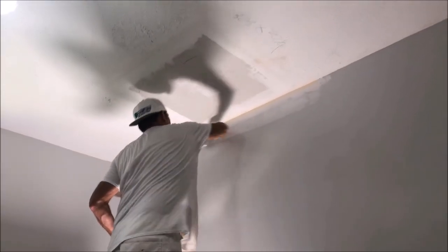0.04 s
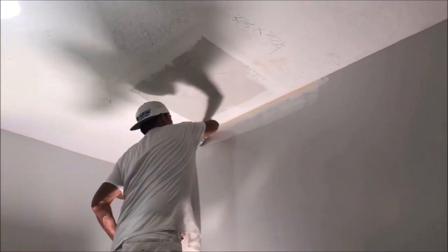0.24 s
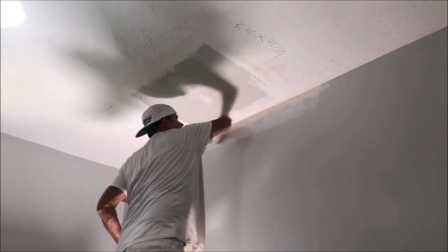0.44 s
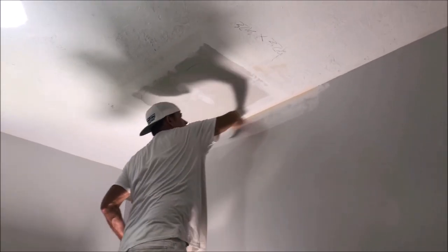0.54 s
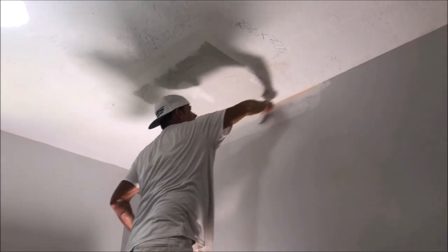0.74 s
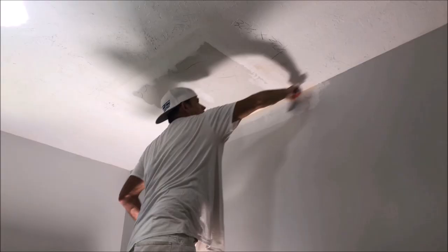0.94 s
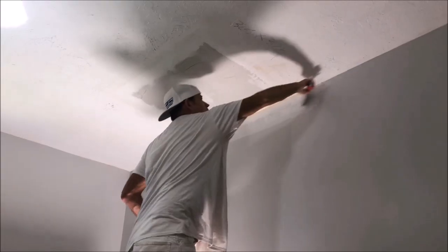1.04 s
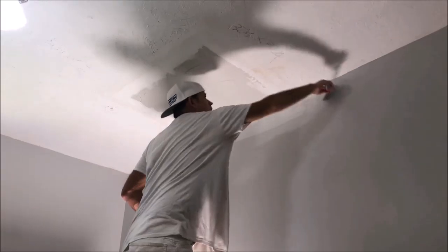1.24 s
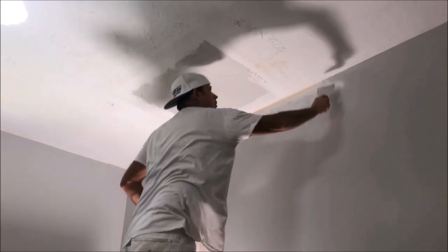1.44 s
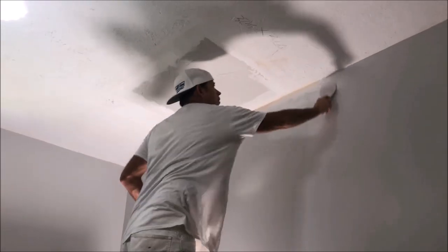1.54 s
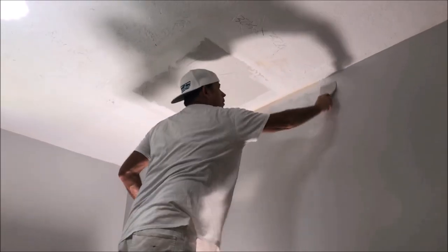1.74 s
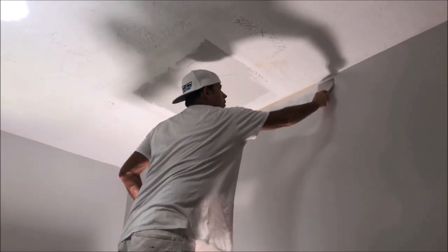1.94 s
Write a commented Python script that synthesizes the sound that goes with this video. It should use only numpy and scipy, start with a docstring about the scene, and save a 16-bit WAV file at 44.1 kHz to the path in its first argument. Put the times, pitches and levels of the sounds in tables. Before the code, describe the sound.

A steel taping knife scrapes dried compound on a ceiling joint. It touches down with a juddering clack around 0.25 s, then rasps from 0.35 to 1.4 s, gritty and ringing, with thin wavering squeaks, ending in a hard rattling catch near 1.35 s. After a short gap, a sharp, loud knock lands at 1.6 s, followed by soft brushes at 1.7, 1.83 and 1.94 s. Bare-room reverberation, faint air and receding hum.

```python
"""A bare room, one microphone across it: a steel taping knife scrapes dried compound along a ceiling joint.
The blade is set down with a short judder, rasps through one long stroke, catches on a ridge and lifts off.
It knocks back on the board and brushes it lightly; filtered clicks make the scraping and the blows' chatter.
Decaying sines make blade and board ring, wavering sines squeak, and noise tails make the room ring on.
Still air and a low, receding hum lie behind."""
import sys
import numpy as np
from scipy import signal
from scipy.fft import rfft, irfft
from scipy.io import wavfile

SR = 44100
rng = np.random.default_rng(int(sys.argv[2]) if len(sys.argv) > 2 else 0)


def unload_audio(sound):
    """Save the sound as a 16-bit wav file, at the path given as the first command line argument."""
    columns = np.transpose(np.atleast_2d(sound))
    # keep every value between -1 and 1, then stretch to whole-number steps
    steps = np.round(np.clip(columns, -1, 1) * 32767)
    wavfile.write(sys.argv[1], SR, steps.astype(np.int16))


N = 88200
T = np.arange(N) / SR

# Event levels are source levels, ahead of the trims below and the direct/room balance.
# The long stroke: t/s, rasp level/dB, gritty treble level/dB
STROKE_LEVELS = [(0.335, -38, -66), (0.367, -34.5, -42), (0.407, -33.5, -39.5), (0.487, -28, -35.5),
                 (0.69, -26.5, -30.5), (0.74, -25.5, -37), (0.80, -25.5, -31), (0.857, -28, -32.5),
                 (0.97, -28.5, -30), (1.101, -28.5, -30.5), (1.127, -30.5, -32.5), (1.185, -26, -34),
                 (1.253, -32, -36.5), (1.347, -21.5, -30), (1.39, -38, -41.5)]
# What the stroke shakes: t/s, board boom level/dB, blade flex level/dB
SHAKE_LEVELS = [(0.335, -64, -42), (0.361, -53, -35.5), (0.425, -36.5, -40.5), (0.495, -40, -33.5),
                (0.533, -47, -43.5), (0.675, -69, -49), (0.737, -62, -42), (0.781, -68, -40),
                (0.833, -46, -38.5), (0.891, -48, -40), (0.915, -39, -35), (0.959, -54, -53),
                (1.041, -69, -57), (1.091, -55, -44), (1.201, -49, -44.5), (1.321, -45, -42.5),
                (1.371, -48, -35), (1.39, -48, -44)]
# The gripping edge makes one resonance sing: centre t/s, Gaussian half length/s, f/Hz, waver/Hz, level/dB
SQUEAKS = [(0.414, 0.017, 2150, 14.6, -37.5), (0.43, 0.04, 1452, 17.5, -42.5), (0.44, 0.03, 4100, 97, -51),
           (0.272, 0.014, 585, 12.4, -41), (0.483, 0.021, 579, 13, -35.5), (0.60, 0.047, 3080, 80.5, -37.5),
           (0.712, 0.066, 1706, 6.1, -35), (0.71, 0.067, 3350, 46, -37), (0.824, 0.075, 1805, 16.6, -35.5),
           (0.92, 0.011, 580, 8.3, -34), (0.974, 0.055, 1800, 26.3, -40), (1.03, 0.087, 3290, 46, -37.5),
           (1.325, 0.041, 2830, 60, -39), (0.664, 0.1, 600, 13.5, -47.5), (1.073, 0.03, 1035, 17, -40),
           (0.735, 0.018, 258, 6.8, -47), (0.46, .035, 158, 7.1, -49), (0.941, 0.021, 235, 12, -47.5),
           (0.01, 0.026, 450, 30, -50.5), (0.431, 0.024, 225, 13.7, -43)]
# The blade strikes or catches: t/s, clack level/dB, tick level/dB, blade ring level/dB,
# board thump level/dB, thump f/Hz, hollow board knock level/dB, blade flex level/dB, chatter decay/s
KNOCKS = [(0.237, -31.5, -44, -40.5, -40.5, 217, -52, -29.5, 0.014),
          (0.267, -36, -40.5, -43.5, -43, 227, -48, -50, 0.0049),
          (1.325, -32, -48, -40, -46, 248, -39, -64, 0.003),
          (1.346, -25, -29, -32, -35.5, 196, -44, -58, 0.0092),
          (1.366, -27, -41, -39, -30.5, 234, -31.5, -54, 0.0087),
          (1.379, -28, -38, -39.5, -40, 217, -37.5, -48, 0.0034),
          (1.595, -34, -65, -47, -43, 202, -52, -52, 0.0067),
          (1.6015, -17.5, -21.5, -30.5, -27.5, 158.3, -34, -52, 0.0044),
          (1.612, -30, -52, -39.5, -30, 241.5, -45, -55, 0.011),
          (1.637, -28, -42, -44, -50, 180, -41, -44, 0.003)]
# Light brushes on the board: peak t/s, rasp level/dB, thump level/dB, flex level/dB, rise/s, decay/s
BRUSHES = [(0.005, -64, -63, -47, 0.0083, .025), (0.303, -48, -50, -46, 0.059, 0.0043),
           (1.689, -33.5, -48, -45.5, 0.033, 0.018), (1.827, -39.5, -71, -76, 0.029, 0.018),
           (1.938, -43, -52.5, -54, 0.032, 0.034)]

# Blade modes: f/Hz, level when rubbed/dB, level when struck/dB, t60 when pressed/s
BLADE_MODES = [(1062, -3, -4, 0.12), (1167, -5.5, -8, 0.13), (1250, -5, -18.5, .09), (1439, 3, -11, 0.064),
               (1695, 0.5, -5, 0.079), (1810, -9, 2, 0.07), (1914, -8, -0.5, 0.083),
               (2160, 2.5, -16, 0.086), (2238, -6, -2.5, 0.073), (2518, -0.5, -18, 0.091),
               (2675, -24, -3, 0.16), (2820, -9, -3, 0.11), (2890, -2.5, 1, 0.074), (3054, 4, -4.5, 0.099),
               (3228, 1.5, -16, 0.067), (3335, 0.5, -17, 0.075), (3500, -20, -6.5, 0.098),
               (3920, -8, 0, .1)]
# Hollow modes of the plasterboard: f/Hz, level/dB, t60/s
BOARD_MODES = [(430, -5, 0.21), (596, -5.5, 0.23), (792, -1.5, 0.24), (910, -4, 0.085)]

# Colours, by shape only: f/Hz, relative level per Hz/dB
# Rasp of breaking crumbs
RASP_COLOUR = [(150, -33), (450, -30), (800, -6), (1080, 3), (1900, 2.5), (2650, -0.5), (3150, -1),
               (4200, -1), (6000, -18.5), (12000, -62)]
# Gritty treble
GRIT_COLOUR = [(1500, -7), (3500, 1), (5000, 2.5), (6500, 2.5), (8500, 0), (11000, -3), (14000, -7.5),
               (15500, -33)]
# Boom of the board under the stroke
BOOM_COLOUR = [(70, -35), (125, -15), (155, -2), (195, -5), (240, 4.5), (310, 0.5), (430, -8.5), (800, -38)]
# Flexing of the blade
FLEX_COLOUR = [(350, -40), (490, -10), (545, 1.5), (618, 4), (665, -6), (900, -44)]
# Clack of a blow
CLACK_COLOUR = [(100, -33.5), (250, 1.5), (450, 3), (620, 2), (1000, -2.5), (1250, 1), (1500, -2.5),
                (1820, 6), (2350, -4.5), (2850, -1), (3300, 2), (3850, -2.5), (4600, -4), (9000, -24)]
# Dull thump of the board
THUMP_COLOUR = [(40, -10), (100, -15), (152, 3), (225, 3.5), (300, -4), (420, -6.5), (700, -32)]
# Bright snap of steel on compound
CRACK_COLOUR = [(300, -18), (1000, -5), (1800, 8), (2400, 0), (3000, 3), (4500, 0), (9000, -5), (14000, -9)]
# Edge skimming the surface
BRUSH_COLOUR = [(200, -1), (420, -6.5), (800, 3), (1200, 4), (1700, -1.5), (3000, 3), (5000, -7.5),
                (9000, -11.5), (14000, -20.5)]
# Still air of the room
AIR_COLOUR = [(20, -9), (50, -10), (100, -14), (250, -7), (550, -11), (900, -16), (2000, -23.5),
              (5000, -29), (9000, -29.5), (12000, -37), (15000, -53)]
# Decay of the bare room: f/Hz, t60/s
ROOM_T60 = [(120, 0.18), (500, 0.45), (1500, 0.47), (3500, 0.41), (7000, 0.37), (14000, 0.33)]

# Stroke: coarse crumbs, fine dust, and the edge sticking and slipping
STROKE_FADE_S = 0.0049
CRUMBS_PER_S, CRUMB_SPREAD_DB = 4500, 2
POWDER_PER_S, POWDER_SPREAD_DB = 36000, 1.1
JUDDER_HZ, CRUMB_JUDDER_DB, POWDER_JUDDER_DB = 88, 4, 3.05
RASP_DB, RING_DB, GRIT_DB, BOOM_DB, FLEX_DB = -4, -7, -1.5, -5, -3.5
WAVER_HZ, SQUEAK_FLICKER_DB = 70, 3.5  # rate of the random wander; spread of the squeak level
# Knocks
CHATTER_PER_S, KNOCK_RING_DB = 10000, -14
RUMBLE_DB = -4  # dull noise, relative to each thump
THUMP_T60_S, THUMP_RISE_S, MODE_RISE_S = 0.19, 0.0094, 0.00065
FREE_RING = 2.06  # a struck blade rings this many times longer than a pressed one
CRACK_DB, CRACK_DECAY_S = -1, 0.0016  # the instant of impact, relative to the tick
# Background, room and microphone
AIR_DB, HUM_DB, HUM_HZ = -57.5, -61.5, 59.5  # hum level at t = 1 s
HUM_FADE_DB_PER_S = 3
DIRECT_DB, ROOM_BUILD_S = -3, 0.00041  # direct sound relative to the room tail
TONE_DIRECT_DB, TONE_ROOM_DB = -0.5, -13  # snaps and ringing tones
PEAK_LEVEL, CUTOFF_HZ = 0.3, 15600


def stroke():
    """The juddering edge breaks crumbs, which drive the blade and the board."""
    rasp, grit = contact(STROKE_LEVELS)
    boom, flex = contact(SHAKE_LEVELS)
    crumbs = juddering(grains(CRUMBS_PER_S, CRUMB_SPREAD_DB), CRUMB_JUDDER_DB)
    powder = juddering(grains(POWDER_PER_S, POWDER_SPREAD_DB), POWDER_JUDDER_DB)
    out = from_db(RASP_DB) * colour(crumbs * rasp, RASP_COLOUR)
    out += from_db(RING_DB) * rubbed_blade(powder * rasp)
    out += from_db(GRIT_DB) * colour(powder * grit, GRIT_COLOUR)
    out += from_db(BOOM_DB) * colour(crumbs * boom, BOOM_COLOUR)
    out += from_db(FLEX_DB) * colour(crumbs * flex, FLEX_COLOUR)
    return out


def contact(rows):
    """Gains of a level table, fading quickly outside its span."""
    s, *levels = np.transpose(rows)
    outside = np.maximum(s[0] - T, 0) + np.maximum(T - s[-1], 0)
    fade = np.exp(-outside / STROKE_FADE_S)
    return [from_db(np.interp(T, s, db)) * fade for db in levels]


def juddering(force, spread_db):
    """Stick and slip of the edge: the force swells and sags at random; rms 1."""
    return rms_one(force * from_db(spread_db * drift(JUDDER_HZ)))


def grains(per_s, spread_db):
    """Random clicks of uneven size as crumbs break off; rms 1."""
    size_db = spread_db * np.minimum(rng.exponential(1, N), 4)
    sizes = from_db(size_db) * rng.choice([-1, 1], N)
    return rms_one(sizes * (rng.random(N) < per_s / SR))


def rubbed_blade(force):
    """The pressed steel rings in its modes; a white force keeps its level."""
    out, power = 0, 0
    for k, (hz, db, _, t60) in enumerate(BLADE_MODES):
        r = np.exp(-np.log(1000) / (t60 * SR))
        w = 2 * np.pi * hz / SR
        gain = from_db(db) * np.sqrt((1 - r * r) / 2)
        poles = [1, -2 * r * np.cos(w), r * r]
        mode = signal.lfilter([1, 0, -1], poles, force + 1e-18)
        out = out + (-1) ** k * gain * mode
        power += from_db(db) ** 2
    return out / np.sqrt(power)


def squeaks():
    """The gripping edge keeps one resonance of blade or board singing, unsteady in pitch and strength."""
    out = 0
    for s, half, hz, waver, db in SQUEAKS:
        pitch = hz + waver * drift(WAVER_HZ)
        wave = np.sqrt(2) * np.sin(2 * np.pi * np.cumsum(pitch) / SR)
        level = from_db(db + SQUEAK_FLICKER_DB * drift(WAVER_HZ))
        out = out + level * wave * np.exp(-((T - s) / half) ** 2 / 2)
    return out


def knocks():
    """Each blow is a sudden, dying chatter of the edge against the board."""
    chatter = grains(CHATTER_PER_S, spread_db=-3.5)  # negative: sizes spread downward
    drive = np.zeros((4, N))
    for s, clack_db, tick_db, _, thump_db, _, _, flex_db, decay in KNOCKS:
        burst = chatter * sudden_decay(s, decay)
        levels = [clack_db, tick_db, thump_db + RUMBLE_DB, flex_db]
        drive += from_db(levels)[:, None] * burst
    clack, tick, rumble, flex = drive
    out = colour(clack, CLACK_COLOUR) + from_db(KNOCK_RING_DB) * rubbed_blade(clack)
    out += colour(tick, GRIT_COLOUR)
    out += colour(rumble, THUMP_COLOUR)
    out += colour(flex, FLEX_COLOUR)
    return out


def sudden_decay(s, decay):
    """Envelope that jumps to 1 at time s and dies away exponentially."""
    return (T >= s) * np.exp(-np.abs(T - s) / decay)


def knock_rings():
    """Each blow sets blade and board ringing; the thump's pitch depends on where it lands."""
    steel = [(hz, db, FREE_RING * t60) for hz, _, db, t60 in BLADE_MODES]
    out = 0
    for s, _, _, ring_db, thump_db, thump_hz, hollow_db, _, _ in KNOCKS:
        out = out + from_db(ring_db) * struck(s, steel, MODE_RISE_S)
        out += from_db(hollow_db) * struck(s, BOARD_MODES, MODE_RISE_S)
        out += struck(s, [(thump_hz, thump_db, THUMP_T60_S)], THUMP_RISE_S)
    return out


def struck(s, modes, rise, size=22050):
    """Modes (f/Hz, level/dB, t60/s) swell up at time s and die away."""
    t, start = T[:size], int(s * SR)
    out = np.zeros(N + size)
    for hz, db, t60 in modes:
        envelope = np.exp(-np.log(1000) * t / t60) * (1 - np.exp(-t / rise))
        wave = np.sin(2 * np.pi * (hz * t + rng.random()))
        out[start:start + size] += from_db(db) * envelope * wave
    return out[:N]


def cracks():
    """Steel meets the hard compound: a bright snap opens each blow."""
    force = 0
    for s, _, tick_db, *_ in KNOCKS:
        force = force + from_db(tick_db + CRACK_DB) * sudden_decay(s, CRACK_DECAY_S)
    return colour(rng.standard_normal(N) * force, CRACK_COLOUR)


def brushes():
    """The edge skims the surface with little pressure: a soft swell and fall."""
    force = grains(CHATTER_PER_S, spread_db=0.5)
    drive = np.zeros((3, N))
    for s, *levels, rise, decay in BRUSHES:
        swell = np.exp(-np.abs(T - s) / np.where(T < s, rise, decay))
        drive += from_db(levels)[:, None] * force * swell
    rasp, thump, flex = drive
    return colour(rasp, BRUSH_COLOUR) + colour(thump, THUMP_COLOUR) + colour(flex, FLEX_COLOUR)


def travelling(x, count=15):
    """The knife moves along the joint, so each stretch meets another pattern of reflections."""
    step, wet = N / (count - 1), 0
    for k in range(count):
        distance = np.minimum(np.abs(np.arange(N) / step - k), 1)
        near = np.cos(np.pi / 2 * distance)  # neighbouring stretches crossfade
        wet = wet + signal.fftconvolve(x * near, room_tail())[:N]
    direct = from_db(DIRECT_DB)
    return (direct * x + wet) / np.sqrt(1 + direct ** 2)


def room_tail(count=10, size=32768):
    """Dense reflections as noise bands, each dying at the room's rate for its pitch."""
    t = T[:size]
    noise, hz = rfft(rng.standard_normal(size)), np.fft.rfftfreq(size, 1 / SR)
    edges, tail = np.geomspace(20, SR / 2, count + 1), 0
    build = 1 - np.exp(-t / ROOM_BUILD_S)
    for low, high in zip(edges, edges[1:]):
        t60 = at_hz(ROOM_T60, np.sqrt(low * high))
        band = irfft(noise * (hz >= low) * (hz < high))
        band = band * np.exp(-np.log(1000) * t / t60) * build
        # each band's energy follows its width
        tail = tail + band * np.sqrt(2 * (high - low) / SR / np.sum(band ** 2))
    return tail


def background():
    """Still air as coloured noise, and a low, wavering hum that slowly recedes."""
    air = from_db(AIR_DB) * colour(rng.standard_normal(N), AIR_COLOUR)
    hum = np.sqrt(2) * np.sin(2 * np.pi * HUM_HZ * T + 0.5 * drift(hz=1.2))
    hum_db = HUM_DB - HUM_FADE_DB_PER_S * (T - 1) + 0.8 * drift(hz=2.5)
    return air + hum * from_db(hum_db)


def from_db(db):
    """Decibels to gain."""
    return 10 ** (np.asarray(db) / 20)


def rms_one(x):
    """Scale to unit rms."""
    return x / np.sqrt(np.mean(x ** 2) + 1e-20)


def at_hz(points, hz):
    """Read a table on a log-frequency axis."""
    f, value = np.transpose(points)
    return np.interp(np.log(np.maximum(hz, 1)), np.log(f), value)


def colour(x, spectrum, size=8192):
    """Causal minimum-phase filter with the given spectrum; white noise keeps its level."""
    gain = rms_one(from_db(at_hz(spectrum, np.fft.rfftfreq(size, 1 / SR))))
    # folding the cepstrum forward in time makes the filter causal
    cepstrum = irfft(np.log(gain))
    cepstrum[1:size // 2] *= 2
    cepstrum[size // 2 + 1:] = 0
    return signal.fftconvolve(x, irfft(np.exp(rfft(cepstrum))))[:N]


def drift(hz):
    """Smooth random wander of spread 1: noise through two equal low-pass poles."""
    r = np.exp(-2 * np.pi * hz / SR)
    noise = rng.standard_normal(N + SR)
    return rms_one(signal.lfilter([1], [1, -2 * r, r * r], noise)[SR:])  # drop the settling second


def scene():
    """One microphone across the room, the same in both channels; snaps and ringing tones arrive mostly direct."""
    noises = stroke() + knocks() + brushes()
    clear = squeaks() + knock_rings() + cracks()
    in_room = travelling(noises + from_db(TONE_ROOM_DB) * clear)
    mono = in_room + from_db(TONE_DIRECT_DB) * clear + background()
    return np.stack([mono, mono])


def record(dry):
    """The highest peaks are rounded and the top is cut steeply."""
    rounded = PEAK_LEVEL * np.tanh(dry / PEAK_LEVEL)
    low_pass = signal.ellip(10, 0.1, 70, CUTOFF_HZ, fs=SR, output="sos")
    return signal.sosfiltfilt(low_pass, rounded)


dry = scene()
out = record(dry)
unload_audio(out)
```